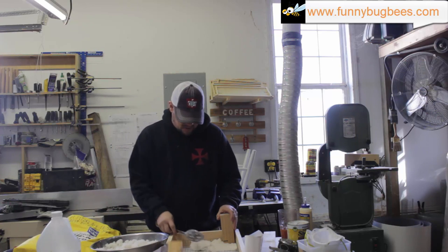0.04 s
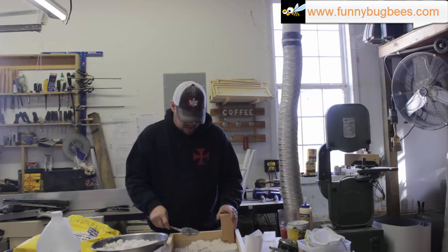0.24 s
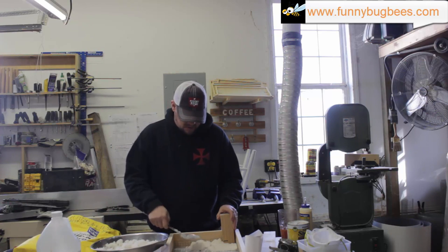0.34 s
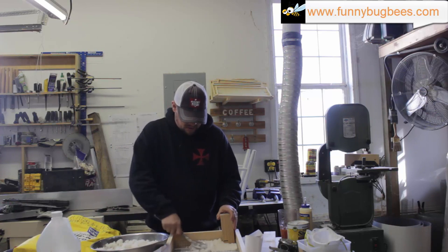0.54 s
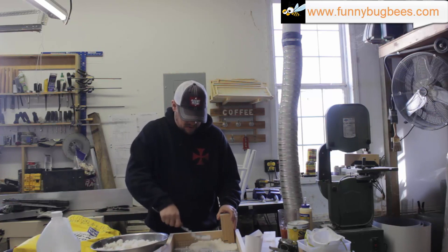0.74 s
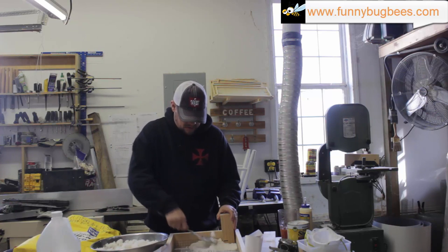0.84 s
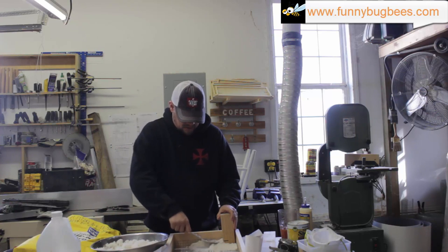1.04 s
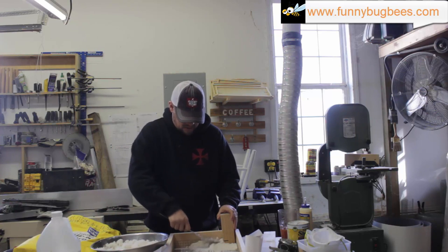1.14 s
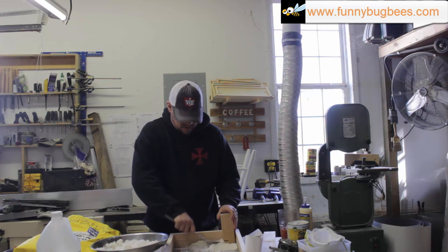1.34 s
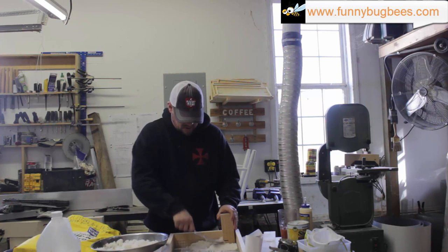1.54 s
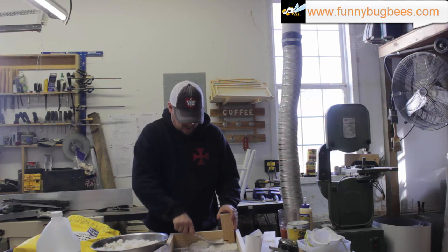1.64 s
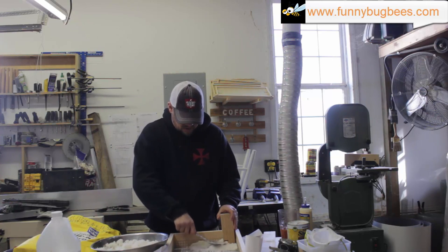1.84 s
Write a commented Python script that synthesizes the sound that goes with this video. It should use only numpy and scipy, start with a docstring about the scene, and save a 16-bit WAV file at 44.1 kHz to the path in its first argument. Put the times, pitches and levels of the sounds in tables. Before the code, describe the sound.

A spoon gives a short gritty scrape through damp mixture at about 0.1 seconds. At 0.2 a wooden frame clatters on the bench, the loudest moment, then slides with a rasp until 0.5. Softer crunching strokes, dull pats and small ticks follow around 1.0, 1.25 and 1.6 seconds. The workshop adds a short echo, with a faint electrical hum and hiss throughout.

```python
"""A short gritty scrape comes first, as a spoon packs a damp, sandy sugar mixture into a wooden frame.
The frame clatters on the workshop bench, rings in its natural modes and slides by stick-slip friction.
Then grains shear and crunch under further strokes, and the spoon pats the mixture with dull thuds.
The bare workshop reverberates behind the work, over a faint mains hum."""
import sys
import numpy as np
from scipy import signal
from scipy.fft import rfft, irfft
from scipy.io import wavfile

SR = 44100
rng = np.random.default_rng(int(sys.argv[2]) if len(sys.argv) > 2 else 0)


def persist_wave(psi):
    """Save psi, clipped to +-1, as 16-bit WAV."""
    counts = np.round(np.clip(psi, -1, 1) * 32767).astype(np.int16)
    wavfile.write(sys.argv[1], SR, np.atleast_2d(counts).T)


N = 83790

# Spectra of room air, sliding rasp, struck wood and grit. Each row: frequency in Hz, relative level in dB.
AIR_SPECTRUM = [(20, -16), (55, 0), (125, -5), (190, -15), (500, -14), (1000, -16), (2300, -19),
                (5000, -23), (10000, -27), (16000, -27.5)]
RASP_SPECTRUM = [(50, -23), (130, 0), (1000, 0.5), (1700, 0), (2200, -3), (5000, -8.5), (8000, -19),
                 (12000, -28.5), (16000, -32)]
WOOD_SPECTRUM = [(40, -37), (100, -14), (165, -16), (250, 1), (400, -3.5), (530, -7), (770, -7), (950, -7),
                 (1250, -13), (1640, -7.5), (2000, -10.5), (2900, -15.5), (4700, -12), (7500, -20.5),
                 (11000, -28), (16000, -31)]
GRIT_SPECTRUM = [(60, -14.5), (150, -6.5), (300, -2.5), (660, -1), (830, -3), (1000, 1.5), (1200, -3),
                 (1600, -2), (2400, -8), (3500, -10.5), (6000, -17), (10000, -24.5), (16000, -26)]
# Mains hum. Each row: frequency in Hz, level in dB, waver in dB (twice the spread).
HUM_PARTIALS = [(59.5, -68.5, 5), (117.7, -61.5, 16.5)]
# Reverberation of the workshop. Each row: frequency in Hz, time to fall 60 dB in seconds.
REVERB_TIMES = [(100, 0.68), (300, 0.59), (1000, 0.52), (3000, 0.58), (6000, 0.45), (10000, 0.38),
                (16000, 0.21)]
# Shudders of the bench. Each row: start, rise and hold in seconds, level in dB, pitch in Hz.
BENCH_JUDDERS = [(.365, 0.011, 0.0059, -40.5, 135), (.405, 0.034, .02, -40, 105)]
# Envelope of the slide. Each row: time in seconds, level in dB.
SLIDE_LEVELS = [(.29, -41), (.325, -39), (0.338, -26), (.365, -29), (0.399, -33), (0.451, -40), (.49, -45),
                (0.532, -70.5)]
# Resonances of the sliding frame. Each row: centre and width in Hz, relative level in dB.
FRAME_RESONANCES = [(324, 120, 2.5), (424, 33, -0.5), (608, 27, 0.5), (790, 38, 6.5), (999, 100, 6.5),
                    (1650, 67, 3), (4700, 850, -30)]
# Modes of frame and bench. Each row: frequency in Hz, relative level in dB, time to fall 60 dB in seconds.
RING_MODES = [(102.3, -15.5, 0.63), (242, 0, 0.51), (336.4, 6.5, 0.39), (433.6, 0, 0.43), (607, 0.5, 0.28),
              (782, 8, 0.14), (950, -2, 0.34), (1657, -7, 0.31), (1657, 12, 0.073), (3423, -9, 0.5),
              (3922, -15, 0.26)]
# Contacts of the settling wood. Each row: start in seconds, then level, bass and treble in dB.
WOOD_CONTACTS = [(0.2009, -15.5, -14, 6), (0.204, -8, 9, -10), (0.2086, -10.5, -8, 3),
                 (0.2141, -12, 26.5, 10), (0.2166, -7, 6.5, -1.5), (0.2322, -14.5, 1, 7),
                 (0.2375, -19, 1, 6), (.2690, -28, -4, -21)]
# Cracking crumbs and spoon touches. Each row: start in seconds, level in dB, centre and width in Hz.
CRUMB_TICKS = [(.345, -25, 4430, 3000), (0.605, -42, 5450, 7940), (0.823, -48, 3170, 600),
               (.824, -45.5, 1090, 496), (.984, -40, 8500, 11000), (1.006, -37.5, 6000, 5000),
               (1.012, -49, 5500, 3000), (1.045, -37, 5630, 3020), (1.250, -37.5, 4300, 1500),
               (1.259, -43.5, 9000, 5000), (1.3125, -48.5, 10900, 7000), (1.5725, -52, 10000, 6000),
               (1.6335, -35, 3650, 700), (1.633, -44, 6270, 900)]
# Rings of the spoon's bowl. Each row: start in seconds, level in dB.
BOWL_RINGS = [(0.984, -50), (1.575, -61)]
# Pats. Each row: start in seconds, level in dB, decay in seconds, pitch in Hz, sag in Hz per second.
SPOON_PATS = [(.938, -52, 0.017, 104, 6), (.987, -43.5, 0.0091, 565, -2), (.990, -44.5, 0.02, 257.4, 0),
              (1.2515, -33.5, 0.0093, 609, 0), (1.253, -39, 0.019, 410.3, 2),
              (1.5722, -39.5, 0.04, 436, 704), (1.5722, -42.5, 0.041, 555, 698),
              (1.636, -44.5, 0.029, 296.5, 311)]
# Strokes. Each row: start, rise, hold and release in seconds, then level, bass and treble in dB.
SPOON_STROKES = [(0.069, 0.025, .025, 0.034, -32, -2.5, 1), (0.545, 0.026, 0.061, 0.024, -47, -3, 3.5),
                 (0.933, 0.0082, 0.044, 0.027, -50, -3, 17), (0.977, 0.02, 0.047, .015, -44.5, 11, 18.5),
                 (1.03, 0.016, 0.021, 0.019, -44.5, -0.5, 3), (1.236, 0.006, 0.012, 0.014, -49, 31, 17),
                 (1.249, 0.0012, 0.042, 0.037, -40.5, 1, -3.5), (1.630, .008, 0.024, 0.025, -46, 10.5, 5.5)]

EVENT_SIZE, ROOM_SIZE = 12288, 32768  # samples
BASS_HZ, TREBLE_HZ, TOP_HZ = 453, 3240, 16000
AIR_DB = -57.5
ROOM_DB, ROOM_BASS_DB, ROOM_GAP_S, ROOM_SHIFTS_PER_S = -4.5, -0.5, 0.0052, 45
EARLY_DB, EARLY_DECAY_S = -6, 0.0094
NULL_HZ, NULL_WIDTH_HZ, NULL_DEPTH = 172, 25, 0.27
SLIPS_PER_S, SLIP_SPREAD_DB, RASP_DB, JUDDER_RELEASE_S = 1100, 2.5, -4, 0.05
KNOCK_DECAY_S, RING_DB, RING_START_S = 0.0031, -28.5, 0.205
TICK_DECAY_S, SPOON_HZ, SPOON_WIDTH_HZ, SPOON_DECAY_S = 0.0025, 4520, 210, 0.038
PAT_SLAP_DB, PAT_WAVER = -6.5, 0.08
GRAINS_PER_S, GRAIN_SPREAD_DB, STROKE_ROUGH_DB = 7000, 2.5, 1.5


def undb(db):
    """Amplitude grows tenfold for every 20 dB."""
    return 10 ** (np.asarray(db) / 20)


def clock(size=EVENT_SIZE):
    """Uniform sampling: the time of each sample in seconds."""
    return np.arange(size) / SR


def unit(x):
    """Normalisation to an rms of 1."""
    return x / np.sqrt(np.mean(x ** 2))


def place(x, start):
    """A pure delay puts a sound at its time in the scene."""
    return np.concatenate([np.zeros(max(int(start * SR), 0)), x, np.zeros(N)])[:N]


def along(points, hz):
    """Interpolation of (Hz, value) points on a log-frequency axis."""
    frequencies, values = np.array(points, float).T
    return np.interp(np.log(hz + 1), np.log(frequencies), values)


def through(x, response):
    """Convolution with an impulse response."""
    return signal.fftconvolve(x, response)[:len(x)]


def colour(x, points, bass_db=0, treble_db=0, size=4096):
    """A minimum-phase filter of unit energy imposes a spectrum and two shelves."""
    hz = np.arange(size // 2 + 1) * SR / size
    bass = bass_db / (1 + (hz / BASS_HZ) ** 2)
    treble = treble_db * hz ** 2 / (hz ** 2 + TREBLE_HZ ** 2)
    cepstrum = irfft(np.log(undb(along(points, hz) + bass + treble)))
    causal = 2 * cepstrum * (np.arange(size) < size // 2)
    response = irfft(np.exp(rfft(causal)))
    return through(x, response / np.linalg.norm(response))


def resonate(x, hz, width):
    """Two-pole resonance with gain 1 at its centre."""
    quality = hz / min(width, SR / np.pi)
    return signal.lfilter(*signal.iirpeak(hz, quality, fs=SR), x + 1e-18)


def walk(rate, size=EVENT_SIZE):
    """Interpolated noise gives a random wander of rms 1."""
    return unit(np.interp(clock(size) * rate, np.arange(1024), rng.standard_normal(1024)))


def swell(rise, hold, release, size=EVENT_SIZE):
    """Exponential damping follows a linear rise and a hold."""
    t = clock(size)
    attack = np.clip(t / max(rise, 1 / SR), 0, 1)
    return attack * np.exp(-np.maximum(t - rise - hold, 0) / release)


def tone(hz):
    """Phase is the integral of frequency: a sine of rms 1 on a moving pitch."""
    return np.sqrt(2) * np.sin(2 * np.pi * np.cumsum(hz) / SR)


def hiss(hz, width):
    """Two resonances in series confine noise to a band, at an rms of 1."""
    return unit(resonate(resonate(rng.standard_normal(EVENT_SIZE), hz, width), hz, 2 * width))


def grains(rate, spread_db, size=EVENT_SIZE):
    """Shot noise: independent tiny clicks, a few much larger than the rest."""
    hits = rng.random(size) < rate / SR
    polarity = np.sign(rng.random(size) - .5)
    strength = undb(spread_db * np.minimum(rng.exponential(size=size), 5))
    return unit(hits * polarity * strength)


def background():
    """Amplitude modulation makes the mains hum waver over the broadband noise of still air."""
    hum = 0
    for hz, db, waver_db in HUM_PARTIALS:
        hum += undb(db + waver_db * walk(6.53, size=N) / 2) * tone(np.full(N, hz))
    return hum + undb(AIR_DB) * colour(rng.standard_normal(N), AIR_SPECTRUM)


def reflections(size=ROOM_SIZE):
    """Bench and machines reflect early; absorption then takes the treble from the tail first."""
    t, hz = clock(size), np.arange(size // 2 + 1) * SR / size
    spectrum = rfft(rng.standard_normal(size)) * undb(ROOM_BASS_DB / (1 + (hz / BASS_HZ) ** 2))
    tail = 0
    for centre, t60 in REVERB_TIMES:
        band = along([(f, f == centre) for f, _ in REVERB_TIMES], hz)
        tail += irfft(spectrum * band) * np.exp(-np.log(1000) * t / t60)
    tail *= np.clip(t / ROOM_GAP_S - 1, 0, 1)
    early = grains(rate=2500, spread_db=3.0, size=size) * swell(0.0023, 0, EARLY_DECAY_S, size)
    return undb(ROOM_DB) * tail / np.linalg.norm(tail) + undb(EARLY_DB) * early / np.linalg.norm(early)


def room(direct, paths=2):
    """Direct sound interferes with reflections that shift as the point of contact moves."""
    angle = np.pi * ROOM_SHIFTS_PER_S * clock(N)
    wet = sum(through(direct * np.cos(angle + np.pi * k / paths), reflections()) for k in range(paths))
    heard = (direct + wet) / np.sqrt(1 + undb(ROOM_DB) ** 2 + undb(EARLY_DB) ** 2)
    # A reflection off the bench top cancels part of the upper bass where the listener is.
    return heard - NULL_DEPTH * resonate(heard, NULL_HZ, NULL_WIDTH_HZ)


def judder():
    """Damped low vibrations shake the bench as the slide slows."""
    out = 0
    for start, rise, hold, db, hz in BENCH_JUDDERS:
        shudder = tone(hz * (1 + .04 * walk(40)))
        out += place(undb(db) * shudder * swell(rise, hold, JUDDER_RELEASE_S), start)
    return out


def slide():
    """Stick-slip friction on the gritty bench drives the frame's resonances."""
    body = 0
    for hz, width, db in FRAME_RESONANCES:
        slips = grains(SLIPS_PER_S, SLIP_SPREAD_DB)
        body += undb(db) * resonate(resonate(slips, hz, width), hz, 4 * width)
    rasp = undb(RASP_DB) * colour(grains(GRAINS_PER_S, GRAIN_SPREAD_DB), RASP_SPECTRUM)
    times, levels = np.array(SLIDE_LEVELS).T
    envelope = undb(np.interp(clock() + times[0], times, levels, right=-np.inf))
    return place((unit(body) + rasp) * envelope, times[0])


def wood_ring():
    """Free vibration: after the knock each mode of frame and bench decays at its own rate."""
    t = clock(ROOM_SIZE)
    modes = 0
    for hz, db, t60 in RING_MODES:
        envelope = swell(0.0022, 0, t60 / np.log(1000), ROOM_SIZE)
        modes += undb(db) * np.sin(2 * np.pi * (hz * t + rng.random())) * envelope
    return place(undb(RING_DB) * modes, RING_START_S)


def knocks():
    """Brief impacts have broad spectra: wood meets wood in a quick run of contacts."""
    out = 0
    for start, db, bass_db, treble_db in WOOD_CONTACTS:
        impact = undb(db) * rng.standard_normal(EVENT_SIZE) * swell(0, 0, KNOCK_DECAY_S)
        out += place(colour(impact, WOOD_SPECTRUM, bass_db, treble_db), start)
    return out


def ticks():
    """Fracture of crumbs and touches of the spoon give transients; its damped bowl rings briefly."""
    out = 0
    for start, db, hz, width in CRUMB_TICKS:
        out += place(undb(db) * hiss(hz, width) * swell(0, 0, TICK_DECAY_S), start)
    for start, db in BOWL_RINGS:
        out += place(undb(db) * hiss(SPOON_HZ, SPOON_WIDTH_HZ) * swell(0, 0, SPOON_DECAY_S), start)
    return out


def pats():
    """Each pat excites a damped hollow resonance and a slap of grains; some thuds sag in pitch."""
    out = 0
    for start, db, decay, hz, sag in SPOON_PATS:
        pitch = hz - sag * np.minimum(clock(), 4 * decay)
        thud = tone(pitch * (1 + PAT_WAVER * walk(300)))
        slap = colour(grains(GRAINS_PER_S, GRAIN_SPREAD_DB), GRIT_SPECTRUM, treble_db=-8.5)
        out += place(undb(db) * (thud + undb(PAT_SLAP_DB) * slap) * swell(0.0018, 0, decay), start)
    return out


def strokes():
    """Granular shear: damp grains slip under the spoon, and their clicks merge into a crunch."""
    out = 0
    for start, rise, hold, release, db, bass_db, treble_db in SPOON_STROKES:
        crunch = grains(GRAINS_PER_S, GRAIN_SPREAD_DB) * undb(db + STROKE_ROUGH_DB * walk(100))
        stroke = crunch * swell(rise, hold, release)
        out += place(colour(stroke, GRIT_SPECTRUM, bass_db, treble_db), start)
    return out


def scene():
    """Superposition: the reverberant contacts add to the wood's vibration and the background."""
    contacts = strokes() + knocks() + slide() + pats() + ticks()
    return (room(contacts) + wood_ring() + judder() + background())[None]


def record(dry):
    """A steep low-pass filter removes the top of the treble."""
    return signal.sosfilt(signal.ellip(10, .2, 80, TOP_HZ, fs=SR, output="sos"), dry)


dry = scene()
out = record(dry)
persist_wave(out)
```